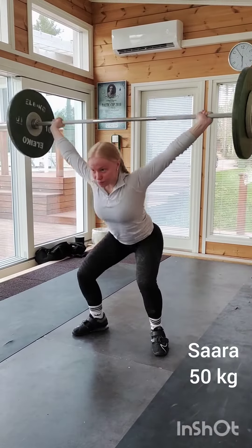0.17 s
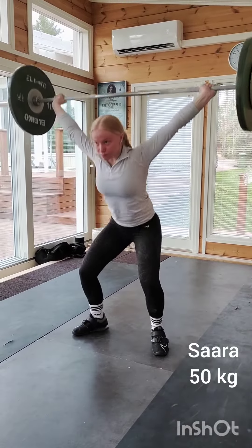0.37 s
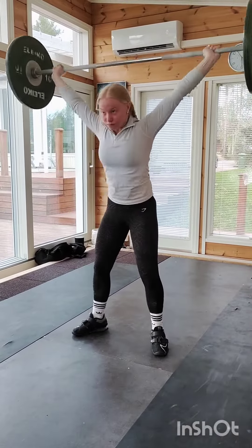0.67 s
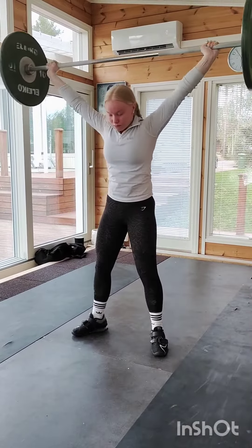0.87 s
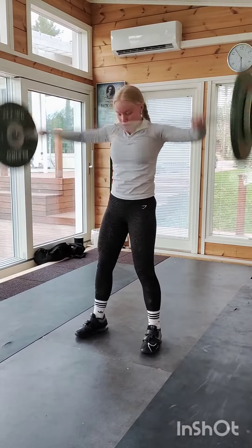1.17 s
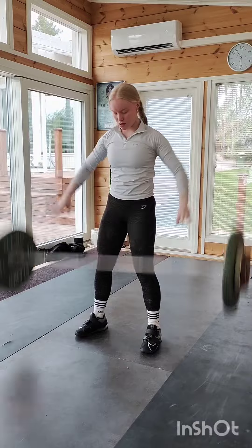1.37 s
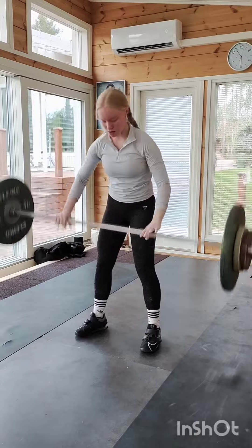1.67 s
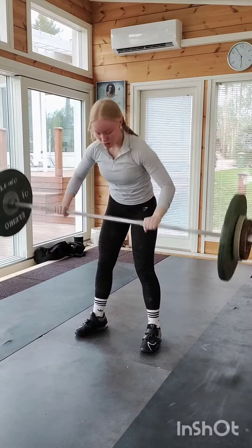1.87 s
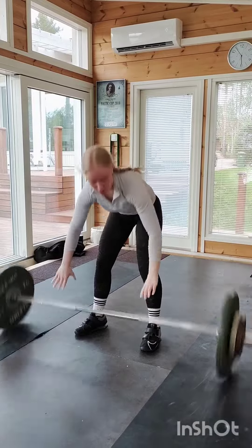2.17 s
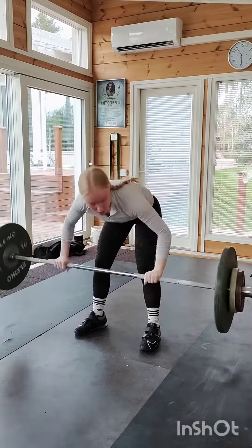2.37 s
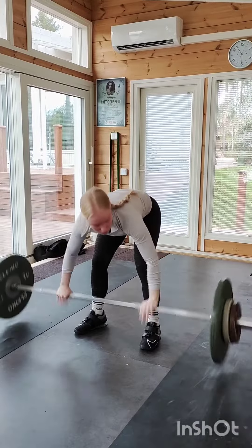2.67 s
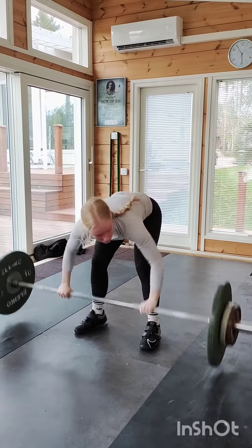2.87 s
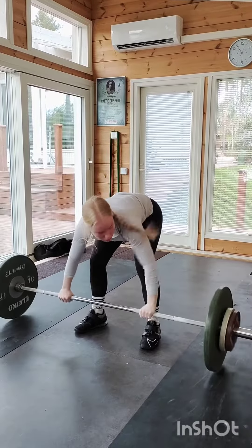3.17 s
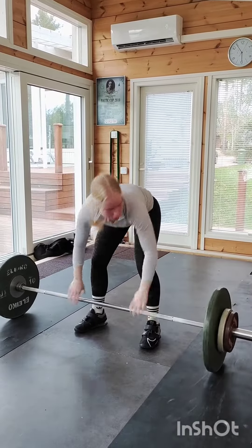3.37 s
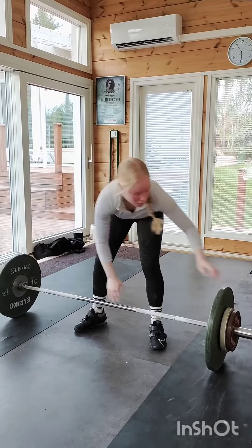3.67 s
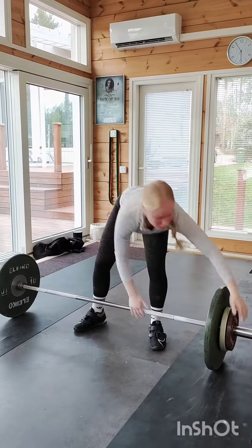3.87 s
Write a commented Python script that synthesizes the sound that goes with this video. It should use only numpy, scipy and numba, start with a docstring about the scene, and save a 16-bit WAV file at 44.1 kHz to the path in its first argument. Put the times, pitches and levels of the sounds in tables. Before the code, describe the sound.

A small, lively home gym holds a steady low ventilation rumble with a soft rush. Around 0.45 s shoes scuff very faintly. At about 1.05 s hands let go of a barbell with a light metallic rattle and scuff, and a shirt swishes softly near 1.2 s. At 1.5 s the loaded bar slams onto rubber matting: a hard bright slap, thick thump, deep floor boom and loud uneven plate clatter, the second end landing just after the first. Steel sleeves ring briefly. A softer, duller bounce with a longer rattle comes at 2.2 s, then others at 2.65, 2.95 and 3.15 s, weakening into little knocks and faint rings at 3.3 and 3.4 s. The low boom fades underneath. Light scuffs follow at 3.7 to 3.85 s, leaving room air. The stereo microphone is fairly close, with short echoes, and its gain ducks after the loud impact.

```python
"""A loaded barbell drops from overhead onto rubber mats in a small wood-panelled gym and bounces to rest.
Each landing slaps and thumps the mat and makes the floor boom: bursts and pushes set off fading tones.
Loose plates then chatter as uneven knocks, and the steel sleeves ring as modes fed by those rattles.
Shoes and hands scuff before and after the bounces; hands let go, and a shirt swishes before the first
landing. Shaped noise is the room air, echoes surround it all, and a gain control ducks loud moments."""
import sys
import numpy as np
from scipy import signal
from scipy.fft import rfft, irfft
from scipy.io import wavfile
from numba import njit

SR = 44100
rng = np.random.default_rng(int(sys.argv[2]) if len(sys.argv) > 2 else 0)


def master_out(mix):
    """Clip the mix to full scale and print it as 16-bit PCM to the path in sys.argv[1]."""
    frames = np.transpose(np.atleast_2d(mix))
    ceiling = np.clip(frames, -1, 1)
    pcm = np.round(ceiling * 32767).astype(np.int16)
    wavfile.write(sys.argv[1], SR, pcm)


N = 177017
TIME = np.arange(N) / SR


def undb(db):
    """Turn decibels into an amplitude factor."""
    return 10 ** (np.asarray(db) / 20)


def unit(x):
    """Scale so that the squares add up to one (unit energy)."""
    return x / np.sqrt(np.sum(x ** 2))


def along(points, hz):
    """Read a curve of (f/Hz, value) points, evenly spaced in octaves as the ear hears pitch."""
    f, value = np.transpose(points)
    return np.interp(np.log(np.maximum(hz, 1)), np.log(f), value)


def convolve(x, response):
    """Pass a sound through a response, channel by channel."""
    return signal.fftconvolve(np.atleast_2d(x), np.atleast_2d(response), axes=1)[:, :N]


def body(points, size=2048):
    """Make a unit-energy response that colours sound with a spectrum and never starts early."""
    log_spectrum = np.log(undb(along(points, np.fft.rfftfreq(size, 1 / SR))))
    # folding the cepstrum gives minimum phase: the energy comes as early as it can
    cepstrum = irfft(log_spectrum)
    cepstrum[1:size // 2] *= 2
    cepstrum[size // 2 + 1:] = 0
    return unit(irfft(np.exp(rfft(cepstrum))))


def ring(modes):
    """Make one fading complex tone per mode, two seconds long, with unit energy in all."""
    hz, db, t60 = np.transpose(modes)[:, :, None]
    waves = undb(db) * np.exp((2j * np.pi * hz - np.log(1000) / t60) * TIME[:2 * SR])
    return waves / np.sqrt(np.sum(waves.real ** 2))


def add(track, s, sound, pan_db=0):
    """Lay a sound into a stereo track at time s; pan_db is left minus right."""
    start = max(int(s * SR), 0)
    sound = sound[..., :N - start]
    track[:, start:start + sound.shape[-1]] += undb([[pan_db / 2], [-pan_db / 2]]) * sound


def diffuse(size, alike_hz=420):
    """Make white noise from all around: both ports share the bass and part in the treble."""
    mid, side = rfft(rng.standard_normal((2, size)))
    likeness = 1 / (1 + (np.fft.rfftfreq(size, 1 / SR) / alike_hz) ** 2)
    mid = mid * np.sqrt((1 + likeness) / 2)
    side = side * np.sqrt((1 - likeness) / 2)
    return irfft(np.array([mid + side, mid - side]), size)


def envelope(rise_s, hold_s, release_s):
    """Make one second of loudness shape: rise, hold, then fade."""
    t = TIME[:SR]
    rise = np.minimum((t + 1 / SR) / rise_s, 1)
    return rise * np.exp(-np.maximum(t - rise_s - hold_s, 0) / release_s)


def chatter(shape, rate=290, scatter_db=4.0):
    """Make unevenly spaced knocks whose strength follows a shape, with unit energy."""
    chance = rng.standard_normal((2, 512))
    gaps = np.exp(.6 * chance[0]) / rate
    at = ((np.cumsum(gaps) - gaps[0]) * SR).astype(int)
    strengths = np.sign(chance[0]) * undb(scatter_db * chance[1])
    heard = at < len(shape)
    knocks = np.zeros(len(shape))
    knocks[at[heard]] = strengths[heard]
    return unit(knocks * shape)


# colour of the room air: (f/Hz, level/dB per Hz)
AIR_SPECTRUM = [(12, -32), (20, 10.5), (43, 1.5), (70, -3.5), (143, -5), (256, -5), (357, -5.5), (421, -9),
                (638, -3), (796, -8.5), (914, -10.5), (2160, -20.5), (3010, -24), (6180, -39.5),
                (15000, -41)]
AIR_DB, WAVER_DB = -39.5, 1  # middle level, and how far it typically wavers


def room_air():
    """Ventilation is steady rumble and soft rush: coloured noise that wavers slightly in level."""
    waver = np.interp(TIME, np.linspace(0, TIME[-1], 30), rng.standard_normal(30))
    return undb(AIR_DB + WAVER_DB * waver) * convolve(diffuse(N), body(AIR_SPECTRUM, size=8192))


# how long echoes take to fade by 60 dB: (f/Hz, fade time/s)
ROOM_FADE = [(60, 1), (200, 0.4), (550, 0.71), (2000, 0.66), (5000, 0.52), (8000, 0.5), (14000, 0.067)]


def room(x, side=1, direct_db=-9, wall_db=-7, build_s=0.003, port_lag_s=.00012, count=14):
    """From the left (side -1) or right (1): direct sound, wall reflections and a tail, top fading fastest."""
    t = TIME[:SR]
    hz = np.fft.rfftfreq(SR, 1 / SR)
    noise = rfft(diffuse(SR))
    centres = np.geomspace(60, 15000, 12)
    tail = 0
    for centre, weights in zip(centres, np.eye(len(centres))):
        band = irfft(noise * along(np.c_[centres, weights], hz), SR)
        tail = tail + band * np.exp(-np.log(1000) * t / along(ROOM_FADE, centre))
    response = tail * (1 - np.exp(-t / build_s)) / np.sqrt(0.052 * SR)
    # glass and panelling reflect; each reflection reaches the two ports at slightly different times
    lags = rng.uniform(0.0018, .03, count)
    sizes = unit(rng.standard_normal(count))
    direct_lags = port_lag_s * np.array([side > 0, side < 0])  # the farther port hears it later
    for port, direct_s in zip(response, direct_lags):
        arrivals = lags + rng.uniform(0, .0005, count)
        port[(arrivals * SR).astype(int)] += undb(wall_db) * sizes
        port[int(direct_s * SR)] += undb(direct_db)
    return convolve(x, response)


# shoes and hands shift: (t/s, relative level/dB, hold/s)
SCUFFS = [(.45, -35, 0.28), (1.099, -26, 0.12), (3.695, -24.5, .01), (3.79, -35.5, 0.061)]
# colour of the scuffs: (f/Hz, level/dB per Hz)
SCUFF_SPECTRUM = [(60, -5), (170, 6), (350, 1.5), (620, 1), (1200, -8.5), (3000, -33.5), (12000, -41.5)]
# colour of the shirt: (f/Hz, level/dB per Hz)
CLOTH_SPECTRUM = [(200, -22), (700, 5), (2000, 5.5), (4000, -12), (8000, -16.5), (15000, -21)]
# the shirt swishes as the arms come down
SWISH_AT_S, SWISH_DB = 1.19, -38.5
SWISH_RISE_S, SWISH_HOLD_S, SWISH_RELEASE_S = 0.038, 0.2, 0.051


def lifter(shuffle_db=27, scuff_rise_s=.004, scuff_release_s=0.024):
    """Shoes and hands scuff as many tiny knocks; cloth swishes as a swell of noise."""
    scuffs, swish = np.zeros((2, 2, N))
    for s, db, hold_s in SCUFFS:
        shape = envelope(scuff_rise_s, hold_s, scuff_release_s)
        add(scuffs, s, undb(db + shuffle_db) * chatter(shape, rate=240, scatter_db=4.0))
    swell = envelope(SWISH_RISE_S, SWISH_HOLD_S, SWISH_RELEASE_S)
    add(swish, SWISH_AT_S, undb(SWISH_DB) * swell * rng.standard_normal(SR))
    return convolve(scuffs, body(SCUFF_SPECTRUM)) + convolve(swish, body(CLOTH_SPECTRUM))


# the plates shift as the hands let go: (second jolt's lag/s, rattle level/dB, rise/s, hold/s,
# treble level/dB, sleeve ring level/dB); the -1 s lag leaves that jolt silent,
# and the negative hold starts the fade before the rise
LET_GO_RATTLE = (-1, -5, 0.01, -0.04, -12.5, -4.5)
LET_GO_AT_S = 1.043
# one end lands, the other follows, and the plates rattle; levels are relative: (t/s, blow level/dB,
# second end's lag/s, rattle level/dB, rise/s, hold/s, treble level/dB, sleeve ring level/dB)
LANDINGS = [(1.499, -0.5, .025, 18.5, .006, 0.048, 9, -12.5), (2.196, -9, 0.03, 11, .002, 0.19, 3.5, -8),
            (2.649, -12, 0.038, 8, 0.033, 0.084, 6.5, -5.5),
            (2.96, -13.5, .042, 3.5, 0.045, 0.054, 0.5, -1),
            (3.160, -17.5, 0.061, -4.5, 0.053, 0.0017, -0.5, 9.5),
            (3.277, -28.5, .056, -0.5, 0.0015, 0.0062, -21, 4),
            (3.401, -31.5, .05, -13, 0.002, 0.023, -43, 10)]
SQUASH_S = .004  # the rubber squashes for a moment before the blow lands in full
RATTLE_RELEASE_S, RATTLE_PAN_DB = .035, -0.9
FLEX_HZ, FLEX_DB = 18, 1  # the bar flexes up and down, so the knocks come in surges
# each end jolts the plates: (first, second end) against the full rattle, and the jolt's decay
JOLT_DB, JOLT_DECAY_S = (-4, -1.5), 0.013


def rattles():
    """Letting go and each bounce jolt the plates into surges: (t/s, level/dB, shape, treble/dB, ring/dB)."""
    t = TIME[:SR]
    surge = undb(-FLEX_DB * np.cos(2 * np.pi * FLEX_HZ * t))
    shakes = [(LET_GO_AT_S, *LET_GO_RATTLE)]
    shakes += [(s + SQUASH_S, *rest) for s, _, *rest in LANDINGS]
    for s, lag_s, db, rise_s, hold_s, treble_db, ring_db in shakes:
        jolts = 0
        for at, jolt_db in zip((0, lag_s), JOLT_DB):
            jolts = jolts + undb(jolt_db) * (t >= at) * np.exp(-np.abs(t - at) / JOLT_DECAY_S)
        shape = jolts + surge * envelope(rise_s, hold_s, RATTLE_RELEASE_S)
        yield s, db, shape, treble_db, ring_db


def crack(decay_s):
    """Crowded, quickly damped modes smear a knock over a few milliseconds with little colour."""
    t = TIME[:SR // 20]
    fade = np.exp(-t / decay_s)
    spectrum = rfft(rng.standard_normal(len(t)) * fade)
    flat = irfft(spectrum / np.abs(spectrum), len(t))
    return unit(flat * np.sqrt(fade))


def clack(knocks, clack_hz=1800, clack_spread=0.38, clack_q=24, dwell_s=0.038, count=10):
    """The point of contact wanders, so every few knocks favour a pitch of their own."""
    spell = TIME[:len(knocks)] // dwell_s
    pitches = clack_hz * np.exp(clack_spread * rng.uniform(-2.175, 2.16, count))
    total = 0
    for k, hz in enumerate(pitches):
        spell_knocks = knocks * (spell == k) + 1e-18  # a trace of offset, far too small to hear
        total = total + signal.lfilter(*signal.iirpeak(hz, clack_q, fs=SR), spell_knocks)
    return total


# colour of the clacking plates: (f/Hz, level/dB per Hz)
PLATE_SPECTRUM = [(120, -12), (350, -9), (560, 2.5), (800, -4.5), (1060, 2), (1450, 3), (1800, -0.5),
                  (2100, 4.3), (2550, -5), (2880, 2), (4100, -13.5), (4830, -4.5), (5500, -15),
                  (7000, -20.5), (8000, -16), (9200, -26.5), (10600, -18), (15000, -25)]
TREBLE_FADE_S = 0.11  # the brightest knocks come first


def plates(clatter_db=24, treble_hz=3800, knock_s=0.0021, clack_db=0,
           bass_hz=600, bass_db=-3, bass_slope=0.38):
    """At one end of the bar, steel hubs knock against the sleeve and the plates clack together."""
    knocks = np.zeros((2, N))
    soft = signal.butter(1, treble_hz, fs=SR)
    deep = signal.butter(1, bass_hz, fs=SR)
    for s, db, shape, treble_db, _ in rattles():
        hits = chatter(shape[:SR // 2], rate=250, scatter_db=6.5)
        burst = undb(db) * signal.fftconvolve(hits, crack(knock_s))
        burst = burst + undb(clack_db) * clack(burst)
        # strong rattles move the whole plate, so they carry more bass
        bass_gain = undb(bass_db + bass_slope * db)
        burst = burst + (bass_gain - 1) * signal.lfilter(*deep, burst)
        # harder contact gives more treble
        dull = signal.lfilter(*soft, burst)
        hardness = undb(treble_db) * np.exp(-TIME[:len(burst)] / TREBLE_FADE_S)
        add(knocks, s, dull + hardness * (burst - dull), RATTLE_PAN_DB)
    return undb(clatter_db) * convolve(knocks, body(PLATE_SPECTRUM))


# ringing modes of the steel sleeves: (f/Hz, relative level/dB, time to fade 60 dB/s)
SLEEVE_MODES = [(1035, -11, 0.85), (1190, -12.5, 0.34), (1370, -5.5, 0.74), (1396, 2.5, 0.95),
                (1417, 2.5, 0.49), (1752, -4.5, 0.55), (1930, -1, 0.5), (2070, -5, 0.71),
                (2120, -3.5, 0.57), (2795, -0.5, 0.5), (2812, -3, 0.56), (4750, -14.5, 0.55),
                (4850, -23, .55), (4965, -27.5, 0.5)]


def sleeves(sleeve_db=20, flutter=0.49, tilt=0.091, pivot_hz=1400, count=22):
    """Every rattle pumps up the sleeves' ringing modes, bright knocks the high ones most."""
    out = np.zeros((2, N))
    waves = ring(SLEEVE_MODES)[:, :SR]
    octaves = np.log2(np.array(SLEEVE_MODES)[:, 0] / pivot_hz)
    fade = np.abs(waves / waves[:, :1]) ** 2
    # echoes beat against each ring, so it flutters as it fades
    echoes = rng.standard_normal((len(waves), count)) + 1j * rng.standard_normal((len(waves), count))
    waves = waves * (1 + flutter * signal.resample(echoes, SR, axis=1))
    for s, db, shape, treble_db, ring_db in rattles():
        # the room brings each mode to the two ports out of step
        phases = np.exp(2j * np.pi * rng.random((2, len(waves))))
        shares = undb(tilt * treble_db * octaves) * phases
        # the knocks' energy adds up in each mode
        swell = np.sqrt(np.cumsum(unit(shape) ** 2 / fade, axis=1))
        tone = (shares @ (swell * waves)).real
        add(out, s, undb(db + ring_db + sleeve_db) * tone, RATTLE_PAN_DB)
    return out


# the end that lands first, then the other: (thump level/dB, floor boom level/dB, slap level/dB,
# contact time ratio, left minus right/dB)
BAR_ENDS = [(-.5, -3, 11, 0.97, -.5), (1.5, 3, -7.5, 1.74, -1.5)]
# contact time of a 0 dB blow before each end's ratio; softer blows last longer (dB per dB of blow)
CONTACT_S, CONTACT_SLOPE = 0.0073, 0.51
SLAP_SLOPE = 1.57  # softer blows lose their slap first (dB per dB of blow)


def contacts():
    """Both ends meet the mat at each bounce: (t/s, thump/dB, boom/dB, contact/s, slap/dB, pan/dB)."""
    for s, blow_db, lag_s, *_ in LANDINGS:
        contact_s = CONTACT_S * undb(-CONTACT_SLOPE * blow_db)
        for at, (thump_db, boom_db, slap_db, longer, pan_db) in zip((s, s + lag_s), BAR_ENDS):
            smack_db = SLAP_SLOPE * blow_db + slap_db
            yield at, blow_db + thump_db, blow_db + boom_db, contact_s * longer, smack_db, pan_db


# booming modes of the sprung floor and flexing bar: (f/Hz, relative level/dB, time to fade 60 dB/s)
BOOM_MODES = [(27.62, -14, 2.45), (33, -14.5, 1.3), (40.8, -1, 0.33), (50, -14, 0.51), (69.5, -14, 0.5),
              (74.2, 1.5, 0.51), (102, -21, 0.5)]
# low shudder of the floor: (f/Hz, level/dB per Hz)
SHUDDER_SPECTRUM = [(8, -40), (16, 7), (30, 15.5), (44, 2.5), (60, 0.5), (200, -51)]
# colour of the thumping rubber: (f/Hz, level/dB per Hz)
THUMP_SPECTRUM = [(40, -7.5), (120, -5), (160, -1), (195, 3.5), (300, 0.5), (400, -4), (560, -3.5),
                  (900, -7.5), (2000, -9), (8000, -40)]
# colour of the slapped mat: (f/Hz, level/dB per Hz)
SLAP_SPECTRUM = [(100, -25), (600, -13.5), (3000, 5.5), (7000, -6), (15000, -4)]


def landings(boom_db=40, thump_db=35, slap_db=20, slap_near=0.11, slap_s=0.0023,
             shudder_db=-19, shudder_s=0.54):
    """A soft push sets the floor booming and shuddering while the rubber thumps and slaps the mat."""
    push, blow, slap, shake = np.zeros((4, 2, N))
    settle = np.exp(-TIME / shudder_s)
    for s, blow_db, push_db, contact, smack_db, pan_db in contacts():
        # half a sine wave of force, cut off at 50 ms
        force = np.sin(np.pi * np.minimum(TIME[:SR // 20] / contact, 1))
        add(push, s + SQUASH_S, undb(push_db) * force / force.sum())
        # shudders add up as energy, hence the square
        shudder_shape = settle * (1 - np.exp(-TIME / contact))
        add(shake, s, (undb(push_db) * shudder_shape) ** 2)
        add(blow, s + SQUASH_S, undb([blow_db]), pan_db)
        add(slap, s, undb(smack_db) * crack(slap_s), pan_db)
    boom = undb(boom_db) * convolve(push, ring(BOOM_MODES).real.sum(axis=0))
    rumble = convolve(diffuse(N), body(SHUDDER_SPECTRUM, size=8192))
    shudder = undb(shudder_db) * np.sqrt(shake) * rumble
    slap = undb(slap_db) * convolve(slap, body(SLAP_SPECTRUM))
    slap[0] = np.roll(slap[0], 4)  # the nearer plate reaches the right port 4 samples sooner
    thump = undb(thump_db) * convolve(blow, body(THUMP_SPECTRUM))
    return boom + shudder + slap_near * slap + room(thump + slap)


def scene():
    """Mix both ends of the barbell, the lifter and the air in the room."""
    left_end = room(plates() + lifter(), side=-1)
    right_end = room(plates(), side=1)
    return landings() + sleeves() + left_end + right_end + room_air()


def ports(x, presence_hz=5000, presence_q=0.99, presence=0.43, left_db=1.0):
    """The two microphone ports differ: the left is a little louder, the right has more presence."""
    band = signal.lfilter(*signal.iirpeak(presence_hz, presence_q, fs=SR), x)
    coloured = x + presence * band * np.array([[-1], [1]])
    return coloured * undb([[left_db / 2], [-left_db / 2]])


@njit
def follow(x, attack, release):
    """Track loudness, rising fast and falling slowly."""
    out, e = np.empty(len(x)), 0.
    for i in range(len(x)):
        e += (x[i] - e) * (attack if x[i] > e else release)
        out[i] = e
    return out


TOP_HZ = 15150


def record(dry, threshold_db=-21, ratio=2.0, attack_s=0.031, release_s=0.31, ceiling=0.99):
    """Gain control ducks when it gets loud, the highest peaks flatten, and the top treble is cut."""
    heard = ports(dry)
    loudness = follow(np.abs(heard).max(axis=0), 1 / (attack_s * SR), 1 / (release_s * SR))
    x = heard * np.maximum(loudness / undb(threshold_db), 1) ** (1 / ratio - 1)
    x = x / (1 + (x / ceiling) ** 8) ** (1 / 8)
    return signal.sosfilt(signal.ellip(8, .2, 70, TOP_HZ, fs=SR, output="sos"), x)


dry = scene()
out = record(dry)
master_out(out)
```